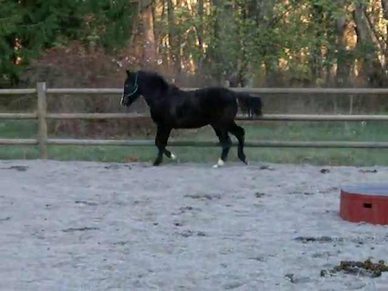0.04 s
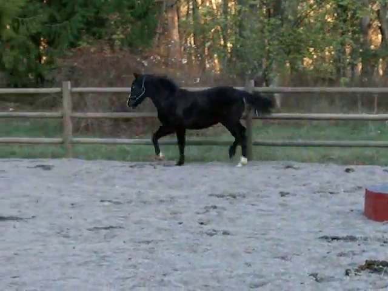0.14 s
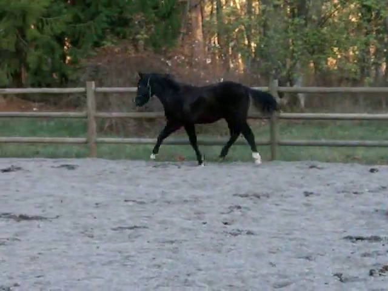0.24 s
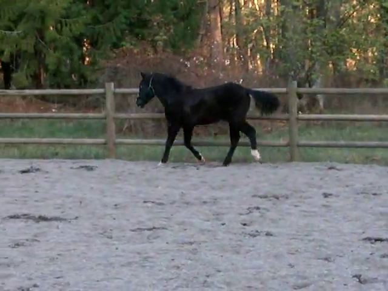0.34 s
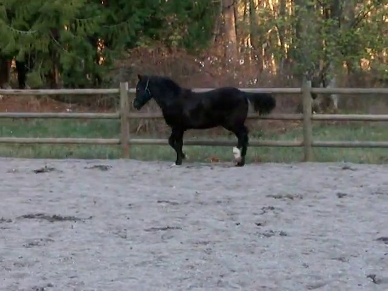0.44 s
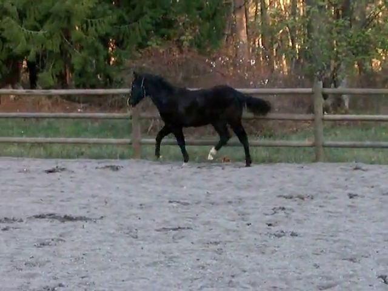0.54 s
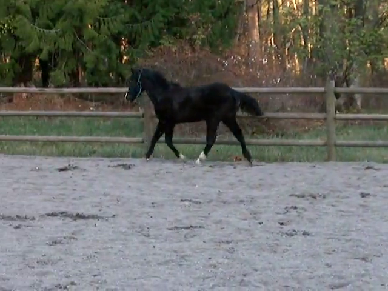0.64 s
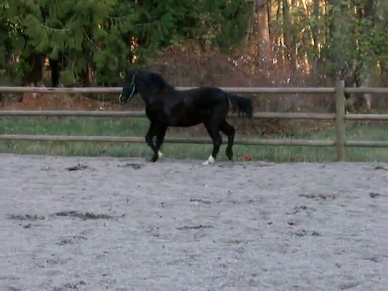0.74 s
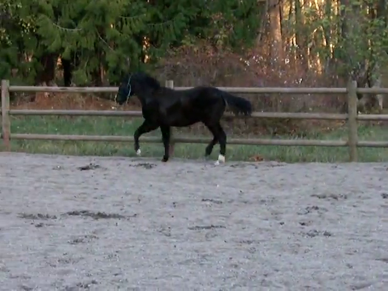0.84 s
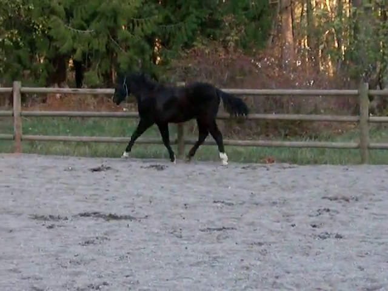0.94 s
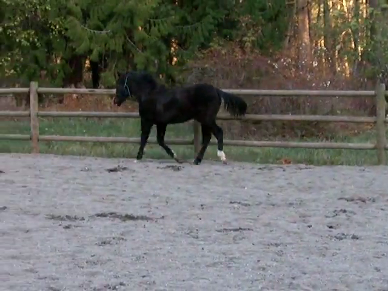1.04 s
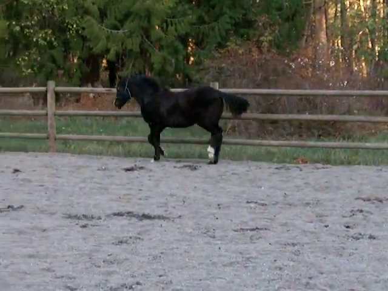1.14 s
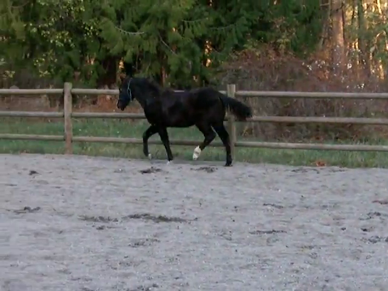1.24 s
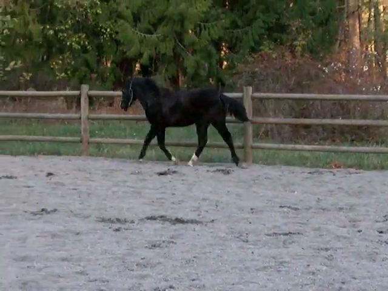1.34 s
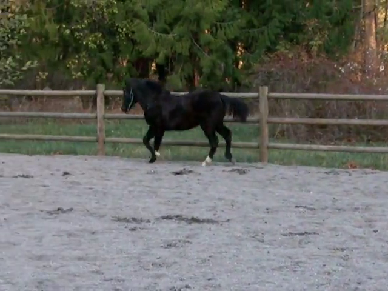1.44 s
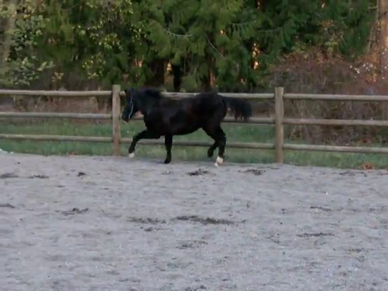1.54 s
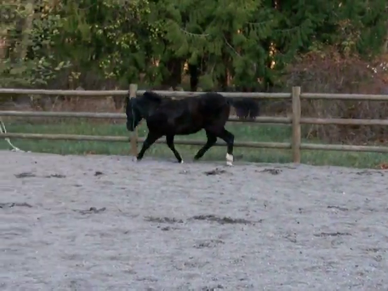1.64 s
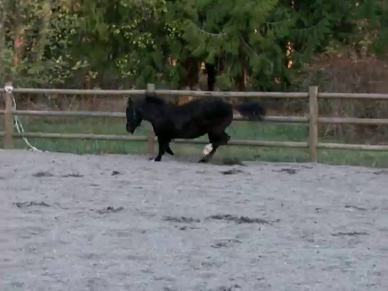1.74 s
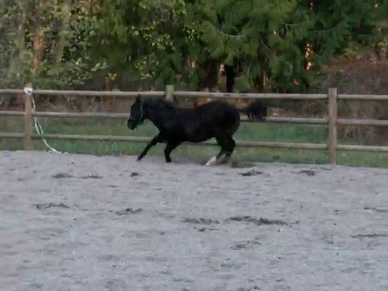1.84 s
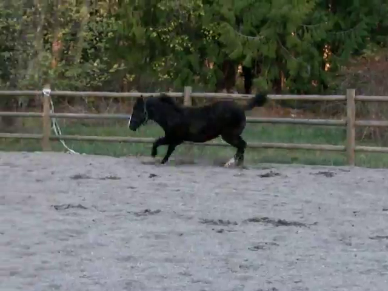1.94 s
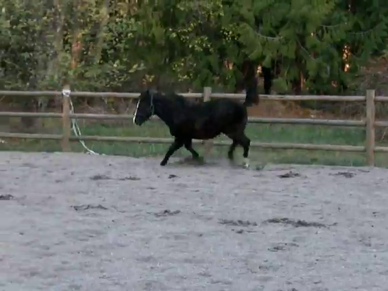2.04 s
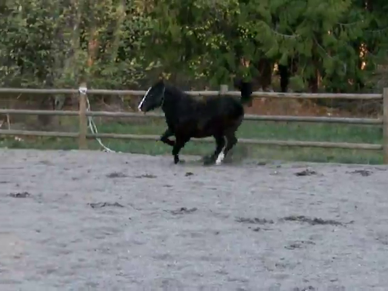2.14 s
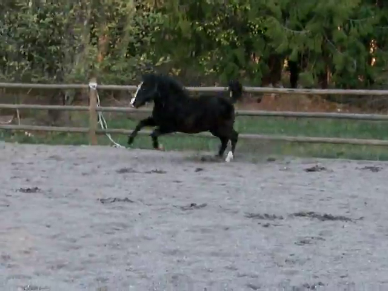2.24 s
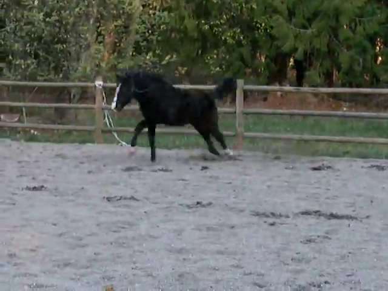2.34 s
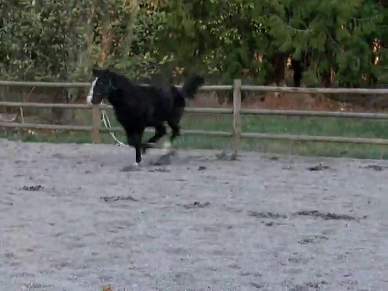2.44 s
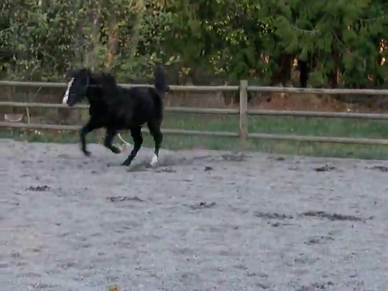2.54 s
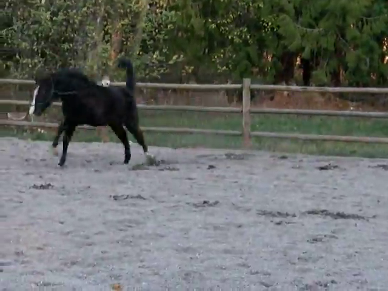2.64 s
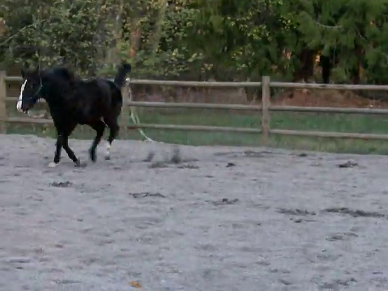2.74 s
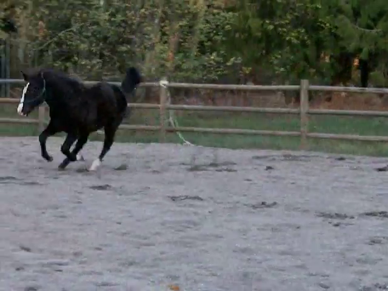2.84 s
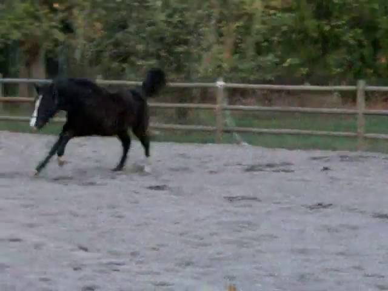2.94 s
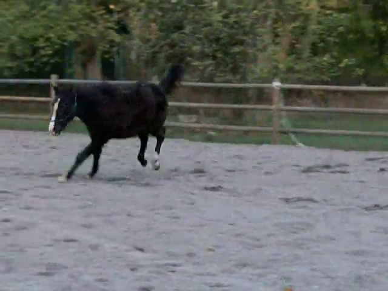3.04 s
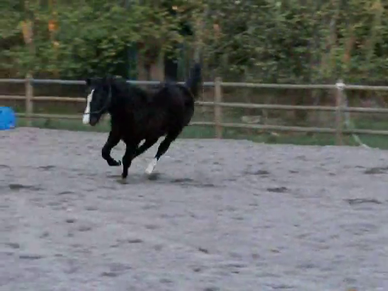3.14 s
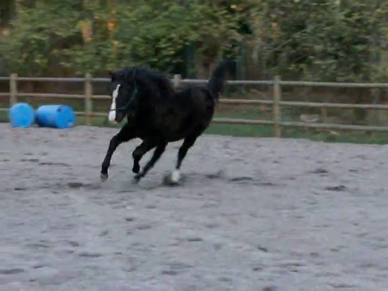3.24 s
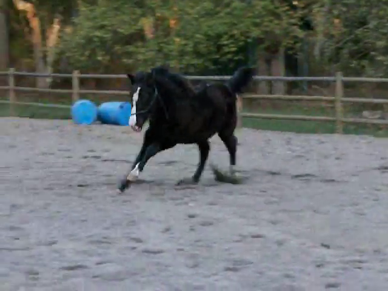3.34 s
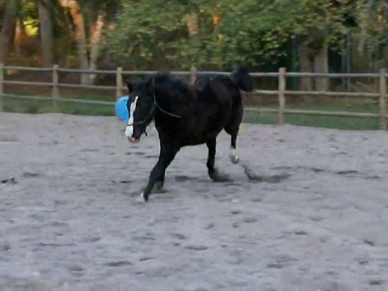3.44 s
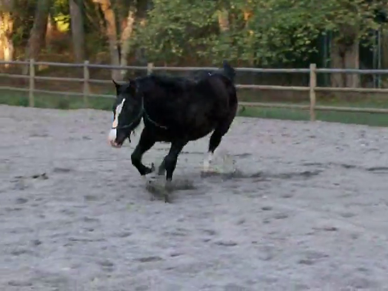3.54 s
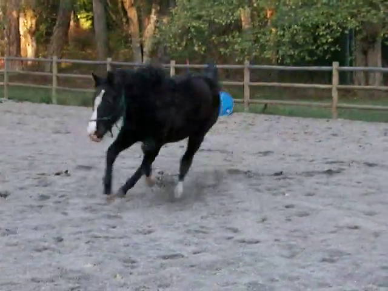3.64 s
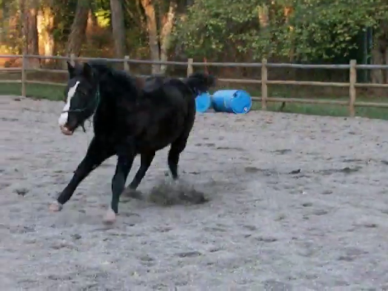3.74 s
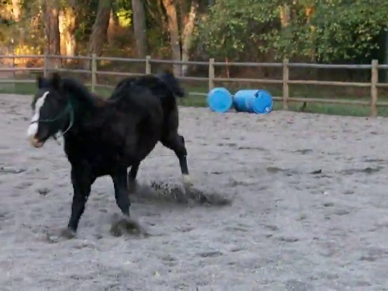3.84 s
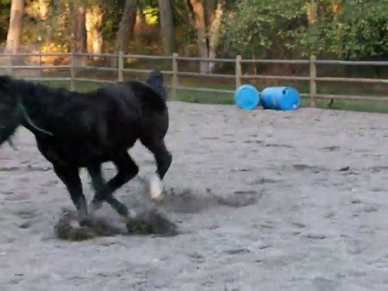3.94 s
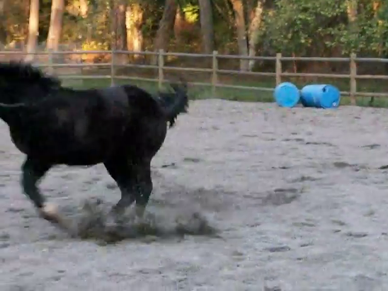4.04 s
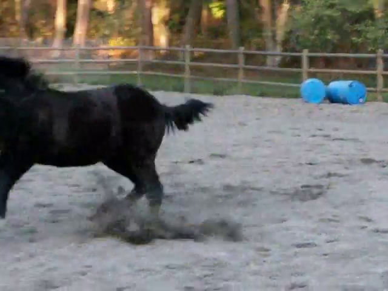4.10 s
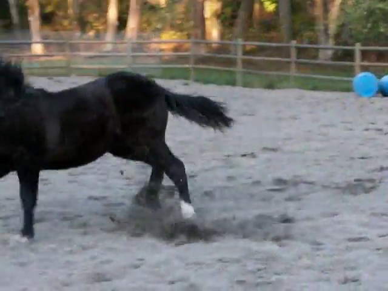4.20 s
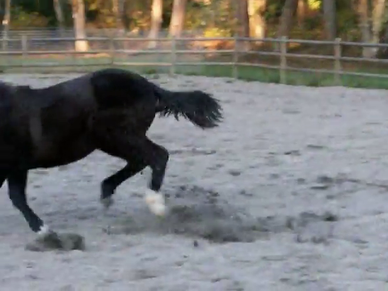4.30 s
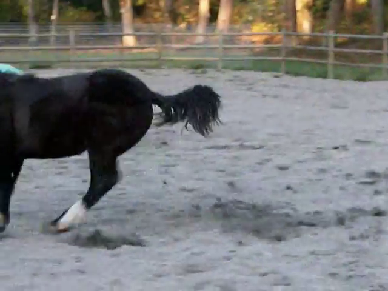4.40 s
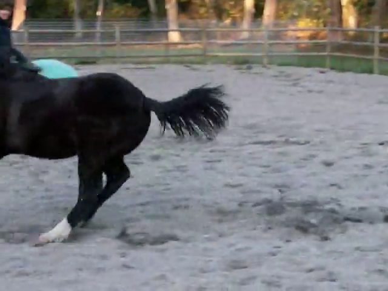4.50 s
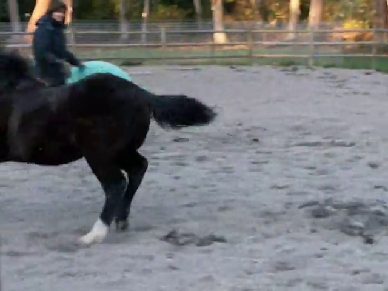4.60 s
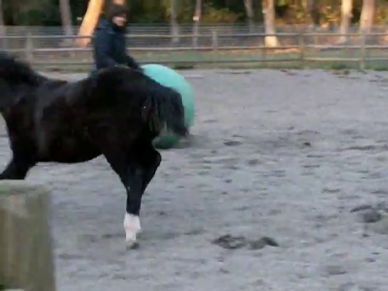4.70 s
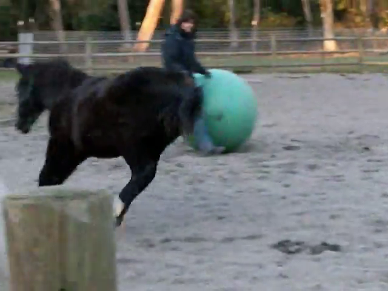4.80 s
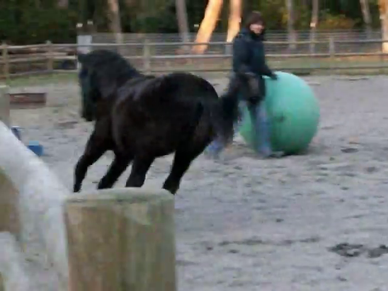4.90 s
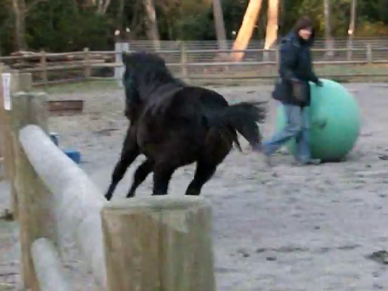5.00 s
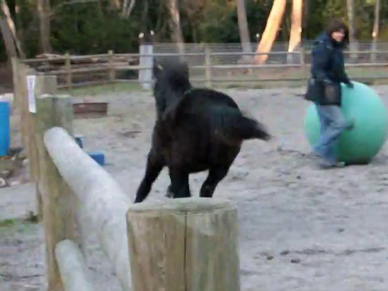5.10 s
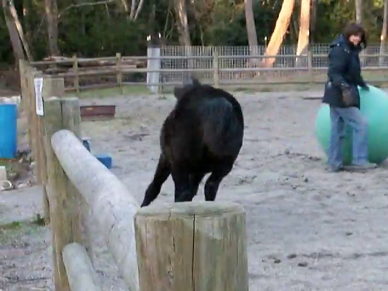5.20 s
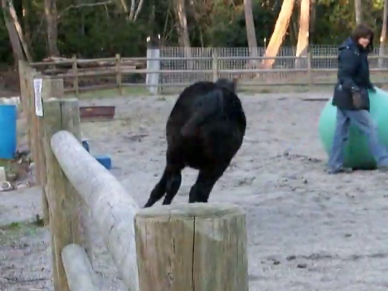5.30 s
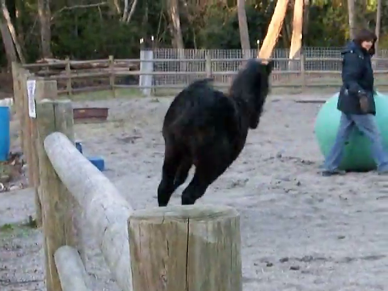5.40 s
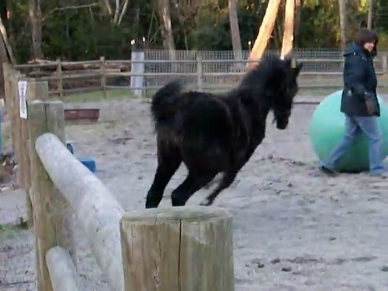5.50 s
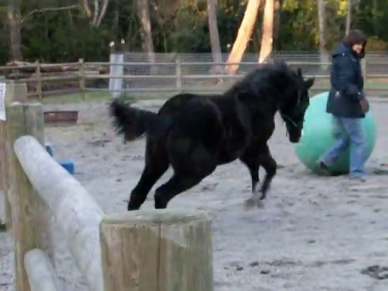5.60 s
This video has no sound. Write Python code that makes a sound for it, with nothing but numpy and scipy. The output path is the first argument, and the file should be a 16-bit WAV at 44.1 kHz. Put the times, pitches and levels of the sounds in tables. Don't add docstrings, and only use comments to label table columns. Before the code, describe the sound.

Outdoor sandy arena, small stereo camera microphone. A loose metal gate rattles and rings on the left in the first second while the horse is barely audible. Wind then thumps the left side, and hoofbeats grow into crunching, sand-spraying strides with sharp stone cracks, loudest around four and a half seconds, then thinning. Camera motor ticks come in short bursts.

```python
import sys
import numpy as np
from scipy import signal
from scipy.fft import rfft, irfft
from scipy.io import wavfile
from scipy.ndimage import uniform_filter1d

SR = 44100
rng = np.random.default_rng(int(sys.argv[2]) if len(sys.argv) > 2 else 0)


def volts_from_db(level):
    exponent = np.asarray(level, float) / 20
    return 10 ** exponent


def unload_wav(signal):
    wavfile.write(
        sys.argv[1],
        SR,
        np.round(np.clip(np.atleast_2d(signal).T, -1, 1) * 32767).astype(np.int16),
    )


N = 249606

# (time [s], lift [dB])
LIFT = [(0, 1), (.5, -2.5), (1, -1), (1.4, 6), (1.8, 7), (2.3, 5.5), (2.8, 6.5), (3.2, 6), (3.7, 6),
        (4.2, 3.5), (4.7, 8), (5.2, 7.5), (5.66, 6)]


def on_log(table):
    hz, value = np.transpose(table)
    bins_hz = np.arange(N // 2 + 1) * SR / N
    return np.interp(np.log(bins_hz + 1), np.log(hz + 1), value)


def colour(x, table):
    y = irfft(rfft(x) * volts_from_db(on_log(table)), N)
    return y / np.sqrt(np.mean(y ** 2))


def noise():
    return rng.standard_normal(N)


def curves(table):
    s, *columns = np.transpose(table)
    return [np.interp(np.arange(N) / SR, s, c) for c in columns]


def walk(rate):
    hold = int(SR / rate)
    steps = np.repeat(rng.standard_normal(N // hold + 1), hold)
    smooth = uniform_filter1d(uniform_filter1d(steps, hold), hold)
    return 1.34 * smooth[:N]


def add(track, s, sound):
    i = max(int(s * SR), 0)
    track[i:i + len(sound)] += sound[:N - i]


def ring(modes, length):
    t = np.arange(int(length * SR)) / SR
    return sum(volts_from_db(db - 60 * t / t60) * np.sin(2 * np.pi * hz * t) for hz, db, t60 in modes)


def blow(hz, cycles, rise):
    u = np.arange(int((6 * cycles + 1) * SR / hz)) * hz / SR
    swing = np.cos(2 * np.pi * (u - rise) / (1 + 0.019 * u))
    swell = np.clip(u / rise, 0, 1) ** 2
    return swing * swell * np.exp(-np.clip(u - rise, 0, None) / cycles)


def grains(spread_db):
    return noise() * volts_from_db(spread_db * uniform_filter1d(rng.exponential(size=N), size=6))


def air():
    # (frequency [Hz], density [dB per Hz])
    wash = [(88, -35.5), (150, -6), (295, -12), (393, -11.5), (735, -11.5), (799, -12), (1420, -18),
            (1740, -21), (1830, -18.5), (2170, -23.5), (3600, -30), (5680, -18), (8520, -53), (11100, -80),
            (18700, -120)]
    shared, left, right = (colour(noise(), wash) for _ in range(3))
    alike = np.clip(on_log([(300, 0.96), (700, 0.85), (1300, 0.49), (2500, 0.13)]), 0, 1)
    apart = np.sqrt(1 - alike ** 2)
    pair = [irfft(alike * rfft(shared) + apart * rfft(own), N) for own in (left, right)]
    return np.array(pair) * volts_from_db(-43.5 + curves(LIFT)[0] + 0.8 * walk(6))


def wind():
    # (time [s], level [dB], left minus right [dB])
    gusts = [(0.0, -43, -1), (.49, -36.5, 9.5), (.9, -45.5, -1.5), (1.3, -33, 8), (1.45, -33, 8),
             (1.55, -26, 12.5), (1.95, -30, 3), (2.36, -26, 4.5), (2.6, -32.5, 10), (3.07, -31.5, 4),
             (3.15, -26, 12.5), (3.42, -23.5, 12), (3.6, -33.5, 14.5), (4.15, -28, 16), (4.6, -33.5, 7.5),
             (4.75, -31, 5), (5.0, -33.5, -11), (5.66, -44, -4.5)]
    # (frequency [Hz], density [dB per Hz])
    rumble_colour = [(12, -8), (30, 2), (60, 0), (100, -4.5), (160, -17.5), (260, -58.5)]
    flap_colour = [(60, -55.5), (120, 6), (200, -6.5), (320, -8), (520, -24), (800, -60.5)]
    # (time [s], peak [dB], swing [Hz])
    presses = [(1.5112, -10, 88), (1.583, -15.5, 65), (1.6443, -14, 108), (1.6578, -13.5, 80),
               (1.7023, -4.5, 182), (1.767, -11.5, 95), (1.957, -12.5, 124), (2.0126, -1, 172),
               (2.0313, -11.5, 117), (2.0981, -4, 123), (2.138, -9, 88), (2.166, -9.5, 99),
               (2.2276, -7, 167), (2.332, -14.5, 123), (2.3768, -9, 90), (2.416, -13, 82),
               (2.4776, -11.5, 96), (2.6346, -18.5, 98), (2.6755, -14.5, 105), (3.0051, -18, 74),
               (3.0194, -11, 67), (3.0383, -14.5, 135), (3.3078, -3.5, 116), (3.3566, -2.5, 137),
               (3.3946, -8.5, 77), (3.457, -8.5, 123), (3.591, -7.5, 113), (3.6788, -14, 126),
               (3.9539, -3.5, 137), (4.1723, -17, 126), (4.1869, -10, 88), (4.425, -12.5, 70),
               (4.459, -14.5, 69), (4.4922, -10.5, 91), (4.5055, -14, 108)]
    sucks = [(1.6062, -4, 195), (1.625, -10.5, 185), (1.671, -9.5, 144), (1.6842, -8, 87),
             (1.7238, -15, 105), (1.8456, -21, 88), (1.8646, -5, 119), (1.8811, -15.5, 79),
             (2.2662, -6, 132), (2.298, -9, 154), (2.3159, -12.5, 182), (2.448, -12, 126),
             (2.7508, -18, 122), (2.8142, -20, 220), (3.1466, -15.5, 66), (3.2637, -16, 109),
             (3.288, -8, 116), (3.4285, -11, 169), (3.4437, -0.5, 136), (3.5444, -11, 84),
             (3.5764, -13, 95), (3.6432, -11.5, 131), (3.751, -19, 253), (3.803, -10.5, 260),
             (3.838, -9, 177), (3.8585, -6.5, 94), (3.903, -12, 87), (3.9348, -12.5, 107), (3.981, -18, 85),
             (3.9958, -14, 97), (4.146, -19, 106), (4.2177, -14.5, 77), (4.3358, -8.5, 106),
             (4.3516, -12, 113), (4.6831, -14, 74)]
    wake_db, wake_s = -15.5, 0.024

    gust_db, pan_db = curves(gusts)
    slaps, wake = np.zeros(N), np.zeros(N)
    spread = np.linspace(-2, 2, int(4 * wake_s * SR))
    eddies = [(*row, 0) for row in presses] + [(*row, np.pi) for row in sucks]
    for (s, db, hz, way), chance in zip(eddies, rng.standard_normal(len(eddies))):
        turn = way + 0.38 * chance
        u = np.arange(-2 * SR / hz, 2 * SR / hz) * hz / SR
        swing = np.cos(2 * np.pi * u + turn) * np.exp(-(u / 0.45) ** 2)
        add(slaps, s - 2 / hz, volts_from_db(db) * swing)
        add(wake, s - 2 * wake_s, volts_from_db(2 * (db + wake_db)) * np.exp(-spread ** 2))

    out = np.zeros((2, N))
    for side, sign in enumerate((1, -1)):
        port_db = gust_db + 5.5 - 10 * np.log10(1 + volts_from_db(-2 * sign * pan_db))
        port_db = 10 * np.log10(volts_from_db(2 * port_db) + (1 - side) * wake)
        rumble = volts_from_db(2.75 * walk(24.06)) * colour(noise(), rumble_colour)
        flap_db = 0.27 * (port_db + 26.0) - 14 + 4.2 * walk(35)
        flap = volts_from_db(flap_db) * colour(noise(), flap_colour)
        out[side] = (rumble + flap) * volts_from_db(port_db)
    out[0] += slaps
    return out


def gate():
    # (time [s], level [dB], rise [s], fall [s])
    shakes = [
        (0, -38.5, 0.00091, 0.089),
        (.32, -45.5, 0.014, 0.022),
        (0.374, -27.5, 0.023, 0.035),
        (.47, -28.5, 0.0082, 0.014),
        (0.514, -43, 0.014, 0.038),
        (.635, -48, 0.018, 0.097),
        (1.04, -45.5, 0.023, 0.023),
        (1.084, -37.5, 0.0033, 0.049),
    ]
    # (frequency [Hz], level [dB], t60 [s])
    tube = [(2304, -6, .6), (2562, -10, .15), (2863, -2, .45), (3171, -5, .12), (3466, -9, .2),
            (3580, -6, .4), (3960, -1, .09), (4130, -9, .5), (4414, -17, .4), (4603, -10, .4),
            (4823, -8, .2), (5232, -1, .07), (5361, -6, .3), (5582, -6, .15), (5733, -8, .3),
            (5964, -7, .12), (6223, -12, .1), (6450, -15, .1)]
    # (frequency [Hz], density [dB per Hz])
    links = [(1500, -23), (2400, -9), (2900, -4.5), (4000, -3), (5300, 2), (6000, 2.5), (7000, -10.5),
             (8500, -28.5)]
    # (time [s], level [dB])
    drone_levels = [(0, -45.5), (.4, -51), (.6, -56), (1.1, -58), (1.5, -75), (5.66, -76.5)]

    push = np.zeros(N)
    t = np.arange(SR // 2) / SR
    for s, db, rise, fall in shakes:
        shape = np.clip(t / rise, 0, 1) * np.exp(-np.clip(t - rise, 0, None) / fall)
        add(push, s, volts_from_db(db) * shape)
    body = ring(tube, length=0.5)
    body = body / np.sqrt(np.sum(body ** 2))
    scrape = push * colour(grains(7.2), links)
    left = signal.fftconvolve(scrape, body)[:N] + volts_from_db(7) * scrape
    hum = colour(noise(), [(1650, -22.0), (1770, 9.5), (1820, -20), (1880, 10.0), (1980, -44)])
    left += volts_from_db(curves(drone_levels)[0]) * hum

    shade = volts_from_db(on_log([(2500, 4.0), (4000, -4.5), (5000, -10.5), (5800, -33.5), (8000, -7.5)]))
    right = np.roll(irfft(rfft(left) * shade, N), 9)
    return np.array([left, right])


def camera():
    # (time of first step [s], level [dB], tick over knock [dB])
    bursts = [
        (0.011, -28.5, 13),
        (1.212, -26.5, 13.5),
        (2.7451, -22, 14),
        (3.9452, -24.5, 10.5),
        (4.913, -22.5, 10),
    ]
    # (time [s], level [dB])
    latches = [
        (0.2, -26.5),
        (1.133, -24),
        (1.402, -22.5),
        (2.674, -17),
        (2.923, -20),
        (4.842, -17),
        (5.091, -22),
    ]
    # (frequency [Hz], level [dB], t60 [s])
    housing = [(240, -1, .03), (340, -5, .03), (640, -10, .02), (1005, -4.5, .036), (1290, -9, .015),
               (1540, -6.5, .018), (1850, -11, .018)]
    # (frequency [Hz], density [dB per Hz])
    tick_colour = [(1800, -8), (2500, -11.5), (3200, -3.5), (3900, 4), (4700, 5.5), (5300, 6.5),
                   (6000, -40), (9000, -56)]
    # (frequency [Hz], level [dB])
    whine_tones = [(716.0, -55.5), (1437, -68.5)]

    knock, tick, clunk = np.zeros(N), np.zeros(N), np.zeros(N)
    double = np.zeros(200)
    double[[0, 132]] = 0.55, 1
    for s, db, tick_db in bursts:
        for k, scatter in enumerate(rng.standard_normal((5, 2))):
            at = s + k * 1001 / 30000
            add(knock, at + 0.00158, volts_from_db(db + 0.8 * scatter[0]) * double)
            if k > 0:
                add(tick, at, volts_from_db(db + tick_db + 1.1 * scatter[1] - 3.5) * np.ones(1))
    for s, db in latches:
        add(clunk, s, volts_from_db(db) * blow(334, cycles=1.0, rise=0.72))
    soft_knock = uniform_filter1d(knock, size=8) * 8
    body = volts_from_db(-15.0) * signal.fftconvolve(soft_knock, ring(housing, length=0.05))[:N]

    i = np.arange(300)
    snap = np.clip(i / 9, 0, 1) * np.exp(-i / SR / 0.0012)
    rasps = [colour(noise(), tick_colour)[:300] for _ in range(2)]
    ticks = np.array([signal.fftconvolve(tick, snap * rasp)[:N] for rasp in rasps])

    t = np.arange(N) / SR
    drift = np.cumsum(0.002 * walk(2) + 0.003 * walk(25)) / SR
    whine = np.zeros(N)
    for hz, db in whine_tones:
        whine += volts_from_db(db + 5.0 + 0.5 * walk(14)) * np.sin(2 * np.pi * hz * (t + drift))
    whine = whine * volts_from_db(curves(LIFT)[0])
    return (body + clunk) * volts_from_db([[1.0], [-1.0]]) + ticks * volts_from_db([[-1.5], [1.5]]) + whine


def ports(x, other):
    # (frequency [Hz], left minus right [dB])
    balance = [(100, 1), (1500, 1.5), (2600, -3), (3500, -3), (4800, 0.24), (5300, 8), (5900, 13.76),
               (6700, 4.97), (8000, 1.46)]
    # (frequency [Hz], lead [radians])
    lead_table = [(100, .1), (1000, .2), (2000, 0), (2800, .6), (3800, .8), (4600, 1.4), (5100, 2.4),
                  (5500, 1.2), (5900, 1), (6200, 0), (7000, .3), (8300, 0)]
    # (frequency [Hz], likeness [0-1])
    likeness = [(300, 1), (1000, 0.97), (1500, 0.83), (2100, 0.88), (4400, 0.91), (5100, 0.35), (6200, .8),
                (8000, 0.56)]

    alike = np.clip(on_log(likeness), 0, 1)
    half = volts_from_db(on_log(balance) / 2)
    lead = on_log(lead_table)
    left = rfft(x)
    right = (alike * left + np.sqrt(1 - alike ** 2) * rfft(other)) * np.exp(-1j * lead)
    share = 2 / np.sqrt(half ** 2 + half ** -2 + 2 * alike * np.cos(lead))
    return np.array([irfft(share * half * left, N), irfft(share / half * right, N)])


def hooves():
    # (time [s], level [dB])
    rain = [(0.0, -38.5), (0.2, -54.5), (0.36, -51.5), (0.57, -46), (0.8, -51.5), (1.03, -61), (1.12, -47),
            (1.81, -38), (2.8, -37), (3.03, -41), (3.28, -44.5), (3.66, -39.5), (3.85, -33), (4.24, -27),
            (4.36, -32.5), (4.85, -34.5), (5.27, -45.5), (5.66, -47.5)]
    # (frequency [Hz], density [dB per Hz])
    fine_colour = [(1060, -47.5), (1800, -15), (2930, -5.5), (3110, -5.5), (4220, -1.5), (5100, -4.5),
                   (5470, 1), (5920, 2.5), (6870, -6.5), (8520, -29), (11100, -61.5), (18700, -120)]
    coarse_colour = [(250, 3), (500, -3.5), (900, 0.5), (1400, -5), (2200, -5), (3200, -0.5), (5000, -19)]
    # (time [s], spray [dB], slide length [s])
    skims = [(1.854, -31.5, 0.016), (2.002, -48, 0.078), (2.05, -32.5, 0.0056), (2.095, -22, 0.012),
             (2.14, -23, .016), (2.161, -24.5, 0.021), (2.008, -35.5, 0.006), (2.32, -34.5, .1),
             (2.406, -28.5, 0.043), (2.487, -30, 0.049), (2.542, -36, .05), (2.642, -34.5, 0.011),
             (2.885, -41.5, 0.018), (2.921, -32.5, .008), (3.373, -31, .02), (3.469, -39.5, 0.018),
             (3.688, -31.5, 0.019), (2.823, -21.5, 0.015), (2.954, -28, 0.054), (3.037, -13, 0.0036),
             (3.047, -41, 0.017), (3.176, -28, 0.047), (3.335, -24, 0.041), (3.418, -22, .055),
             (3.544, -23, 0.014), (3.597, -21, 0.047), (3.643, -19.5, 0.045), (3.989, -15.5, .035),
             (4.133, -16.5, 0.011), (4.369, -22.5, 0.041), (4.373, -9, 0.0066), (4.405, -23, .046),
             (4.559, -18, 0.012), (4.563, -14, .005), (3.174, -21, .005), (4.839, -26, 0.0063),
             (4.845, -18.5, 0.014), (5.167, -31, .032), (5.355, -32, 0.014), (5.189, -36.5, 0.015),
             (5.215, -40, 0.023), (5.47, -43, .015), (5.516, -37, 0.051), (5.59, -43, .012),
             (5.6333, -21.5, 0.026)]
    gouges = [(1.513, -41.5, 0.068), (1.719, -35.5, 0.032), (1.797, -30.5, 0.026), (2.633, -37.5, 0.07),
              (2.737, -22.5, .011), (2.852, -35, 0.028), (3.234, -22.5, .006), (3.261, -27.5, 0.048),
              (3.745, -19.5, 0.054), (3.799, -22, 0.055), (3.845, -22.5, 0.037), (3.791, -34.5, 0.031),
              (3.884, -22.5, 0.059), (3.957, -18.5, 0.032), (4.019, -21, 0.045), (4.06, -23.5, 0.034),
              (4.155, -36.5, 0.064), (4.165, -30, .02), (4.186, -25.5, .016), (4.202, -20.5, 0.058),
              (4.257, -27, 0.05), (4.443, -24.5, 0.044), (4.485, -21, 0.031), (4.533, -26, 0.035),
              (4.603, -24, 0.018), (4.668, -29, 0.029), (4.768, -32.5, 0.01), (4.747, -37, 0.032),
              (4.899, -38, 0.045), (4.94, -21, 0.033), (5.048, -34.5, 0.0083), (5.057, -19.5, 0.011),
              (5.299, -19.5, 0.02), (5.338, -39, 0.049), (5.392, -23.5, 0.024), (5.432, -30.5, 0.028)]
    # (time [s], peak [dB], frequency [Hz])
    thuds = [(0.501, -32, 181), (2.138, -12, 202), (3.033, -18, 178), (3.548, -17.5, 164),
             (3.749, -15.5, 289), (3.798, -4, 302), (3.799, -17, 630), (3.978, -18.5, 210),
             (4.043, -30, 222), (4.137, -15.5, 157), (4.206, -18.5, 442), (4.371, -24, 383),
             (4.498, -22.5, 308), (4.376, -24, 1214), (4.498, -20, 967), (4.502, -19, 800),
             (4.563, -37, 450), (4.564, -23, 1050), (4.57, -15.5, 1250), (5.303, -44, 290),
             (5.321, -19.5, 154), (5.399, -22, 142.6)]
    # (time [s], peak [dB], frequency [Hz])
    pebbles = [(0.851, -22.5, 5940), (1.7994, -18, 5920), (1.8589, -9.5, 5740), (1.8644, -22, 5380),
               (2.0664, -10, 5970), (2.084, -20.5, 5510), (2.097, -6, 5160), (2.1372, -12, 5680),
               (2.1662, -12, 5880), (2.172, -17, 6020), (2.4073, -13.5, 5680), (2.4182, -10, 5570),
               (2.5054, -14.5, 5940), (2.6998, -20, 5620), (2.737, -5.5, 5570), (2.8275, -18, 5660),
               (2.9256, -18.5, 5800), (2.9894, -12, 5900), (3.2573, -20, 5260), (3.2626, -19, 5920),
               (3.421, -7, 5900), (3.5502, -7, 5800), (3.6066, -6.5, 5590), (3.6155, 3.5, 5880),
               (3.6363, -12.5, 5700), (3.6588, -12, 5980), (3.7018, -15, 5850), (3.7443, -12, 5720),
               (3.749, -1, 6230), (3.8088, -5, 5980), (3.8654, -5, 5750), (3.9598, -1, 5930),
               (4.0161, 2, 5370), (4.1051, -14, 5440), (4.1376, -5.5, 6370), (4.2682, -18, 5640),
               (4.309, -15, 5590), (4.3538, -7.5, 5900), (4.3747, -7.5, 6160), (4.4465, -3.5, 5940),
               (4.466, -12, 5870), (4.4791, -13.5, 6100), (4.5303, -12.5, 5850), (4.5737, -7, 5580),
               (4.6058, -9.5, 5640), (4.6265, -8.5, 6280), (4.6412, -16.5, 5200), (4.7106, -5, 5760),
               (4.7708, -17, 5080), (4.838, -13.5, 5840), (4.8495, -6.5, 5680), (4.879, -17.5, 5720),
               (4.912, -18, 5200), (4.9327, -14.5, 5120), (5.0618, -21.5, 5870), (5.22, -23, 5810),
               (5.4399, -17.5, 5300), (5.5282, -22.5, 5390), (5.6343, -15, 5940), (5.6447, -6, 5770),
               (3.039, -11, 5760),
        (3.1772, -15, 3460),
        (4.3735, -1, 6000),
        (4.3752, -2, 3000),
        (4.5660, 0.6, 5700),
        (4.6034, -11, 5700),
    ]
    stones = [(1.9957, -22.5, 4260), (2.0134, -21.5, 3890), (2.689, -19.5, 4950), (2.8612, -15, 4260),
              (3.0412, -13, 3590), (3.141, -20, 4430), (3.1544, -26, 2020), (3.2182, -25, 2970),
              (3.2363, -11, 3310), (3.2459, -15, 4860), (3.2788, -15.5, 4650), (3.3352, -13, 4560),
              (3.5402, -16, 3500), (3.5643, -14.5, 4130), (3.7813, -6.5, 4340), (3.7974, -8.5, 4110),
              (3.8264, -7, 2970), (3.8914, -8, 4800), (3.9037, -4, 5030), (4.5654, -4.5, 3370),
              (4.66, -17.5, 4150), (4.6768, -13, 4140), (4.9222, -19.5, 2580), (4.9606, -7.5, 4050),
              (4.9678, -12, 4040), (5.3049, -4.5, 3030), (5.3956, -10.5, 3640), (5.4097, -16, 4220),
              (5.4761, -22.5, 3920), (5.5921, -23, 4780)]

    rain_db = curves(rain)[0]
    fine = volts_from_db(rain_db + 0.88 * walk(25.15))
    coarse = fine * volts_from_db(-5.5 - 0.32 * (rain_db + 41.5))
    digs = [(*row, -16) for row in skims] + [(*row, -8) for row in gouges]
    for s, db, slide, clods_db in digs:
        t = np.arange(int((slide + 0.12) * SR)) / SR
        bite = np.clip(t / (0.00067 + 0.065 * slide), 0, 1) * (1 + 0.32 * np.exp(-t / 0.019))
        after = np.clip(t - slide + 0.0076, 0, None)
        stop_and_fall = 0.78 * np.exp(-after / 0.0065) + 0.2 * np.exp(-after / 0.024)
        shape = volts_from_db(db - 3.0) * bite * stop_and_fall
        add(fine, s, shape)
        add(coarse, s, shape * volts_from_db(clods_db + 3.0))

    uneven = volts_from_db(2.08 * walk(110))
    lumpy = np.roll(uneven, SR) ** 1.4
    grit = []
    for _ in range(2):
        spray = uneven * fine * colour(grains(4.6), fine_colour)
        clods = lumpy * coarse * colour(grains(6.8), coarse_colour)
        grit.append(spray + clods)

    hits = np.zeros(N)
    for s, db, hz in thuds:
        add(hits, s, volts_from_db(db) * blow(hz, cycles=1.0, rise=0.66))
    for s, db, hz in pebbles:
        add(hits, s, volts_from_db(db - 1.6) * blow(hz, cycles=2.3, rise=2.5))
    for s, db, hz in stones:
        add(hits, s, volts_from_db(db + 1.0) * blow(hz, cycles=1.1, rise=1.3))
    return ports(grit[0] + hits, grit[1])


def scene():
    return air() + wind() + gate() + camera() + hooves()


def top_cut(x):
    return signal.sosfilt(signal.butter(12, 8670, fs=SR, output="sos"), x)


def record(dry):
    low_pass = signal.ellip(6, 0.5, 75, 7950, fs=SR, output="sos")
    high_pass = signal.butter(1, 12, "high", fs=SR, output="sos")
    cut = signal.sosfilt(high_pass, signal.sosfilt(low_pass, dry))
    return top_cut(np.clip(cut, -1, 1))


dry = scene()
out = record(dry)
unload_wav(out)
```